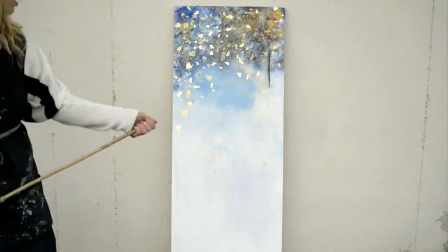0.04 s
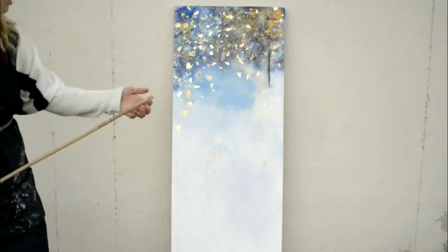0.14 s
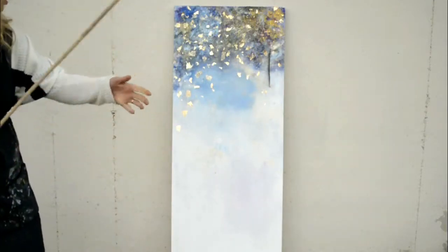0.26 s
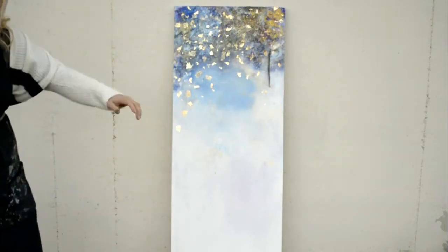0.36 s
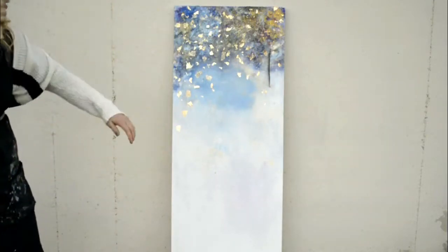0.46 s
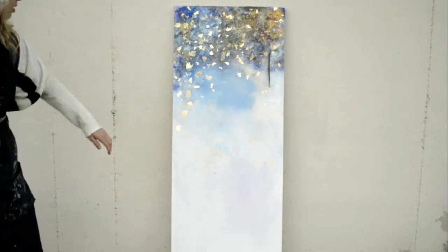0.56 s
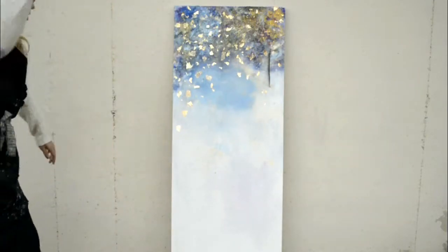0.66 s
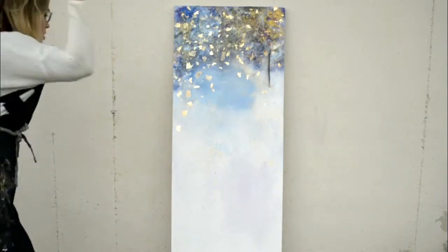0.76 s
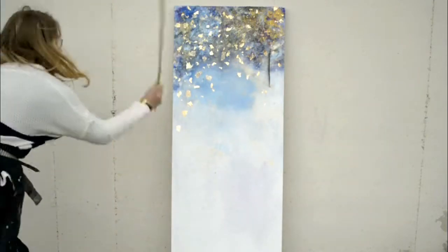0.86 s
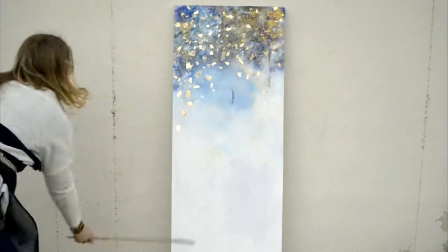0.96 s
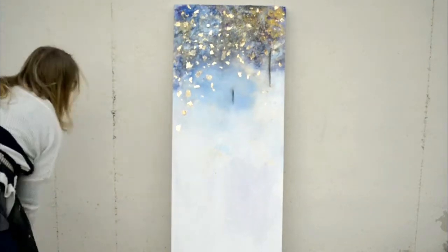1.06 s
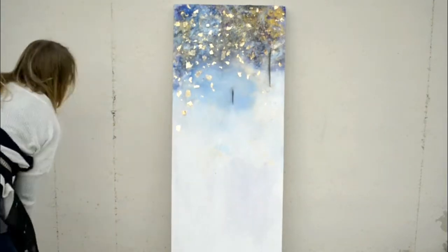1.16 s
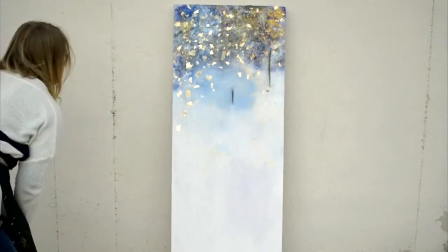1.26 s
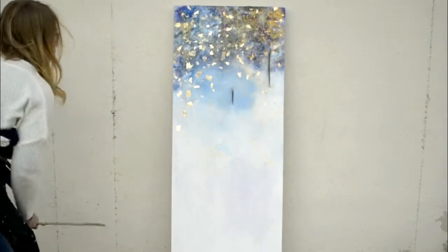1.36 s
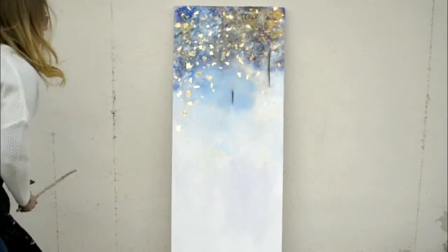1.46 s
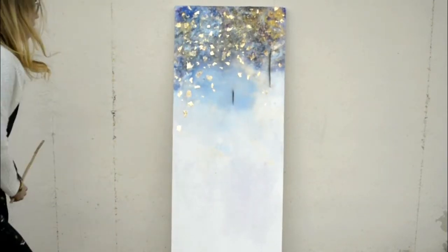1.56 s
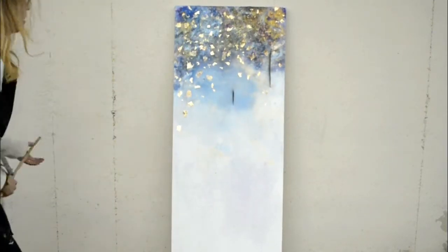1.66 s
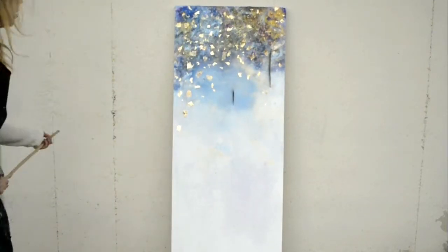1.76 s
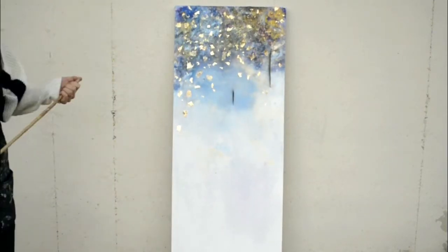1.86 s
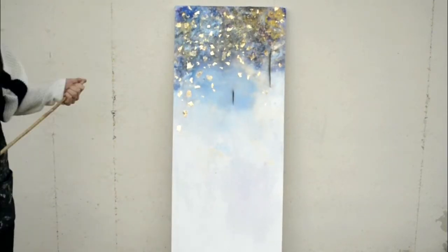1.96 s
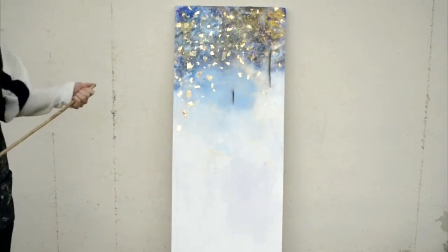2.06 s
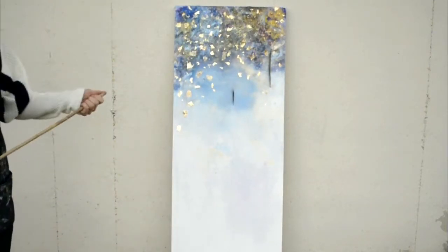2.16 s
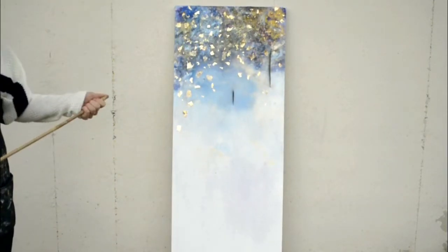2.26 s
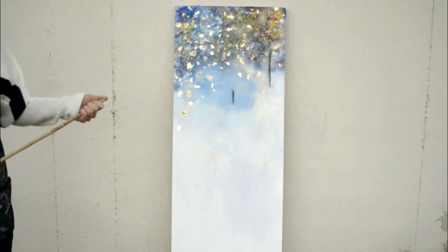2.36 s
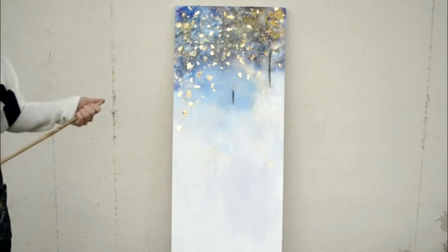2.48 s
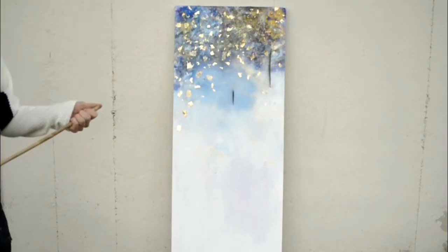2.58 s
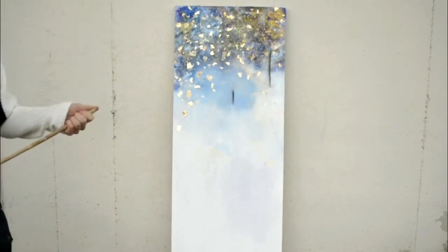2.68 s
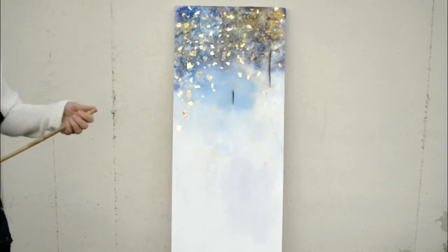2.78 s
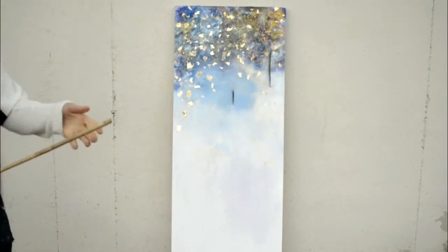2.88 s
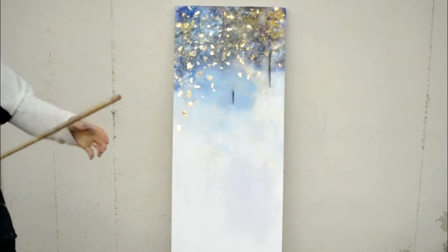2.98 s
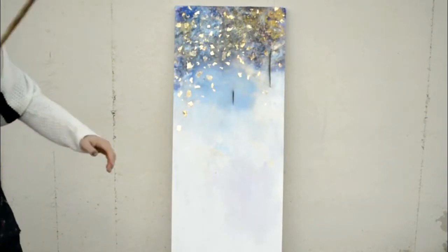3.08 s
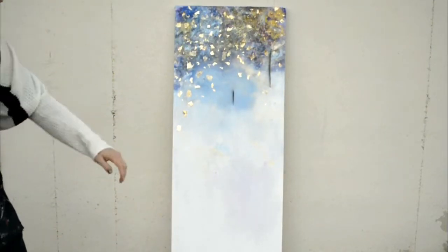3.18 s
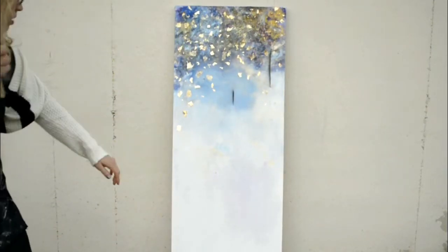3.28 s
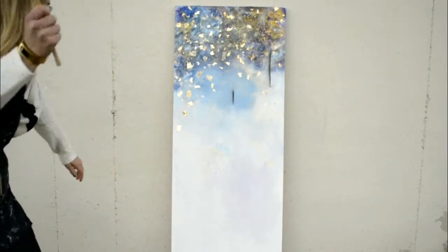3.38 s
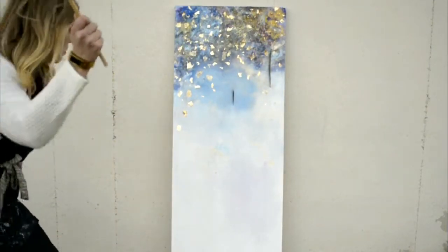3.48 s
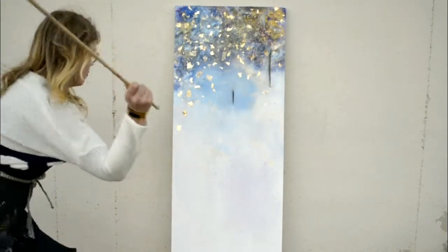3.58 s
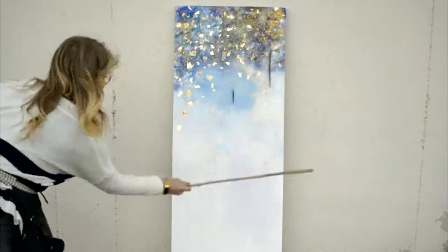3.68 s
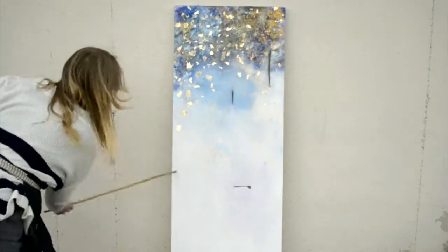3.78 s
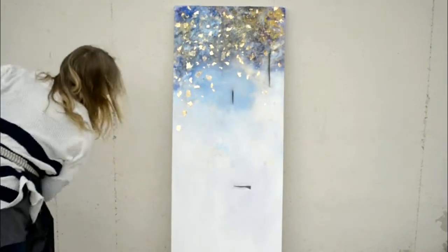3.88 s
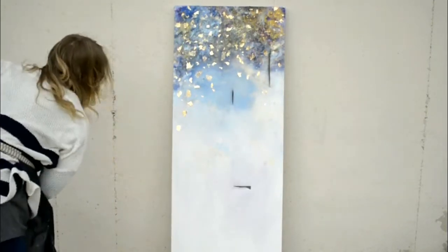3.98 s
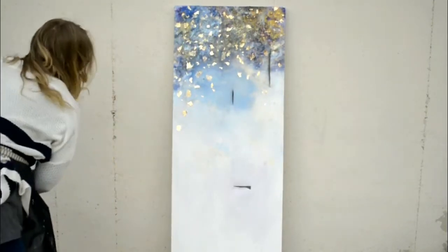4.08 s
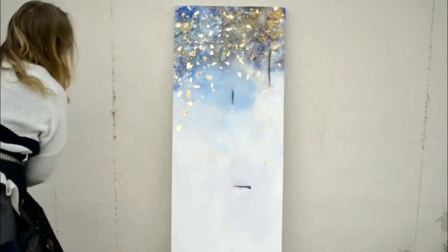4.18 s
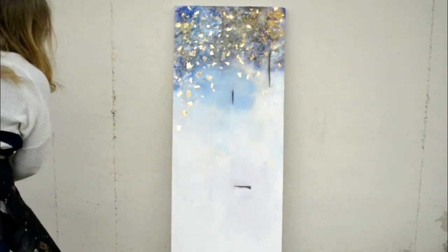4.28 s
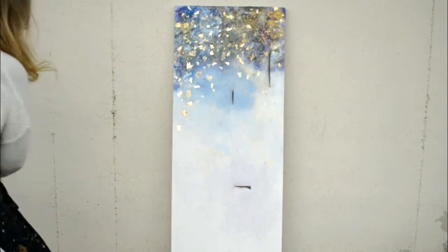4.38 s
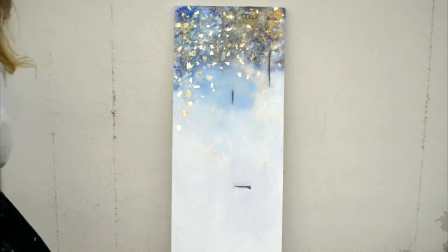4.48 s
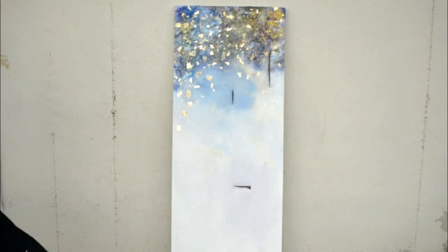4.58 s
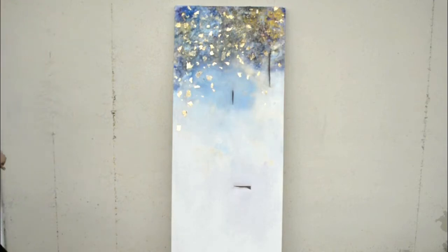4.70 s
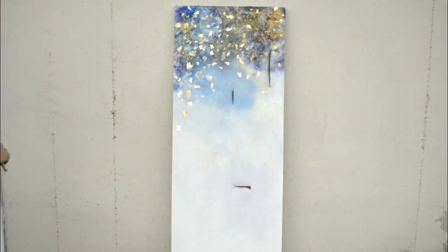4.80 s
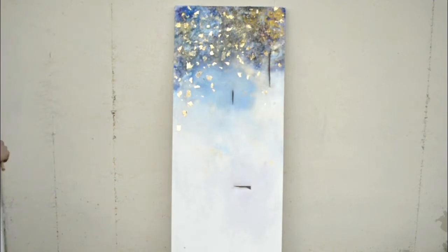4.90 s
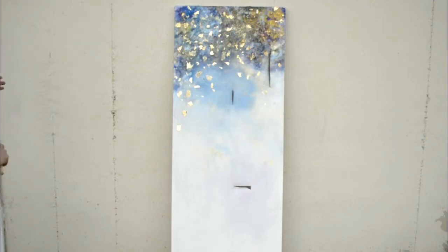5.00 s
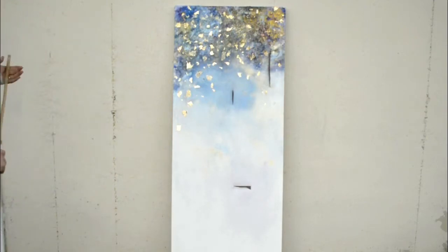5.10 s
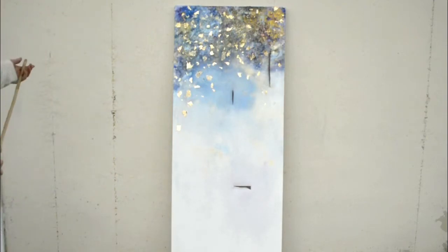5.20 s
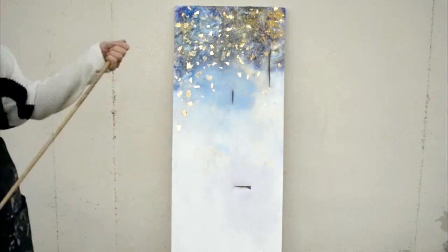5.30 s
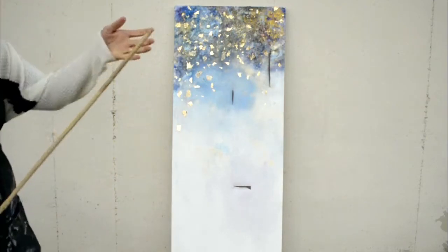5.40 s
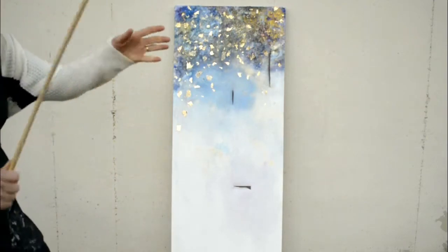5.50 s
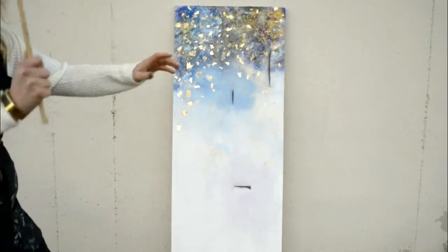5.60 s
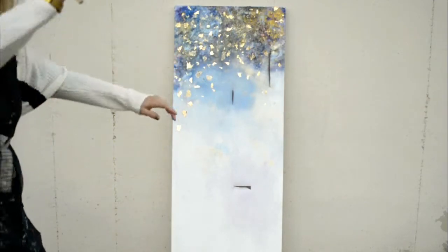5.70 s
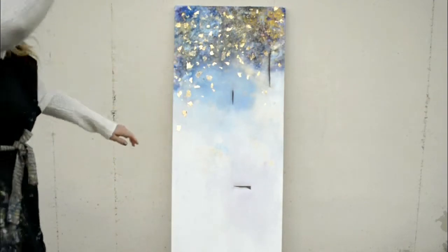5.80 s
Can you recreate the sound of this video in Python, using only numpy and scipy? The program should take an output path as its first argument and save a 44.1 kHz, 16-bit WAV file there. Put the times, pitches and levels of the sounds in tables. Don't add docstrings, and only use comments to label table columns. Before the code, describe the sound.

A long wooden stick cracks sharply against a painted panel twice in a hard-walled studio, with splinters, rustling sleeves and a faint low drone.

```python
import sys
import numpy as np
from scipy import signal
from scipy.fft import rfft, irfft, next_fast_len
from scipy.io import wavfile
from scipy.ndimage import map_coordinates

SR = 44100
rng = np.random.default_rng(int(sys.argv[2]) if len(sys.argv) > 2 else 0)


def linear_from_db(decibels):
    return 10 ** (np.asarray(decibels, float) / 20)


def store_pcm(level_fs):
    pcm = np.round(np.clip(level_fs, -1, 1) * 32767).astype(np.int16)
    wavfile.write(sys.argv[1], SR, np.atleast_2d(pcm).T)


N = 257984


def unit(x):
    return x / np.sqrt(np.mean(x ** 2) + 1e-20)


def along(points, hz):
    f, v = np.transpose(points)
    return np.interp(np.log(hz + 1), np.log(f + 1), v)


def curves(rows):
    s, *cols = np.transpose(rows)
    return [np.interp(np.arange(N) / SR, s, c) for c in cols]


def held(start, end, db, rise_db_per_s, fall_db_per_s):
    t = np.arange(N) / SR
    before, after = np.maximum(start - t, 0), np.maximum(t - end, 0)
    return linear_from_db(db - rise_db_per_s * before - fall_db_per_s * after)


def wobble(rate):
    knots = rng.standard_normal(int(N * rate / SR) + 4)
    return map_coordinates(knots, [np.arange(N) * rate / SR])


def noise(spectrum, size):
    m = next_fast_len(size + 8192)
    gain = linear_from_db(along(spectrum, np.fft.rfftfreq(m, 1 / SR)))
    return unit(irfft(rfft(rng.standard_normal(m)) * gain, m)[:size])


def tone(hz):
    return np.sqrt(2) * np.sin(2 * np.pi * (np.cumsum(hz) / SR + rng.random()))


def ring(modes, t):
    return sum(linear_from_db(db - 60 * t / t60) * np.sin(2 * np.pi * hz * t) for hz, db, t60 in modes)


def add(track, s, x):
    part = track[round(s * SR):][:len(x)]
    part += x[:len(part)]


def roomy(x, wet_db, onset=.0008):
    # f/Hz, t60/s
    decay_times = [(100, 1), (300, 0.21), (1500, 0.42), (4000, 0.33), (12000, 0.18)]
    # f/Hz, level/dB
    wall_colour = [(60, -6), (300, 0.5), (1800, -1), (5000, -4.5), (15000, -16)]
    # level/dB, t60 factor
    far_end = (-16, 2.2)
    hz, t, z = signal.stft(rng.standard_normal(SR), SR, nperseg=256)
    fall_db = -60 * t / along(decay_times, hz)[:, None]
    decay = linear_from_db(fall_db) + linear_from_db(far_end[0] + fall_db / far_end[1])
    colour = linear_from_db(along(wall_colour, hz)[:, None])
    tail = signal.istft(z * colour * decay, SR, nperseg=256)[1]
    first_wall_s = .008
    tail = np.pad(tail / np.linalg.norm(tail), (round(first_wall_s * SR), 0))
    start = x * np.exp(-np.arange(len(x)) / (onset * SR))
    level = linear_from_db(wet_db) * np.linalg.norm(x) / np.linalg.norm(start)
    wet = level * signal.fftconvolve(start, tail)
    return wet + np.pad(x, (0, len(wet) - len(x)))


def blows():
    # t/s, crack level/dB, contact/s, release f/Hz, first rebound delay/s
    hits = [
        (0.9168, -1.8, .00037, 4311, .0031),
        (3.7328, 1.83, 0.00026, 8208, .0018),
    ]
    # f/Hz, level/dB, t60/s
    high_modes = [(233, -4, 0.048), (333, -5, 0.11), (407, 0.5, 0.052), (445, -0.5, 0.1), (630, -5.5, .06),
                  (766, -5.5, .06), (1017, -2.5, 0.035), (1303, -7, .05), (1700, -1.5, 0.042),
                  (2400, -11.5, 0.048), (3260, -11.5, 0.014), (4900, -18, 0.035)]
    # f/Hz, level/dB, t60/s
    low_modes = [(173.7, -1, 0.096), (205, 2, 0.066), (423, -7.5, 0.039), (564, 0.5, 0.051),
                 (700, -4.5, 0.062), (896, -6, 0.041), (1101, -2.5, 0.043), (1160, -4.5, 0.054),
                 (1345, -8, 0.054), (1534, -5.5, 0.04), (1816, -5.5, 0.086), (2090, -7, 0.047),
                 (2501, -8.5, 0.046), (2977, -11.5, .04)]
    # f/Hz, density/dB per Hz
    paint = [(300, -120), (800, -6), (1800, 0.5), (3500, -1.5), (6000, -6), (9000, -8.5), (12000, -15.5),
             (16000, -24)]
    release_db, ring_db, rattle_db, room_db = -4, -17, -21.5, -21.5
    rebound_db, rebound_loss_db, rebound_slows, rebound_width_s = -6.5, 4.5, 1.2, .0002
    out, t = np.zeros(N), np.arange(SR // 3) / SR
    for (s, db, touch, release_hz, rebound), modes in zip(hits, (high_modes, low_modes)):
        let_go = 1 / (1 + np.exp(np.minimum((t - touch) / .000022, 50)))
        push = let_go * (1 - np.exp(-t / .00004))
        after = np.maximum(t - touch, 0)
        release = linear_from_db(release_db - 60 * after / 0.0029) * np.cos(2 * np.pi * release_hz * after)
        suction = .44 * np.exp(-after / 0.00082)
        crush = linear_from_db(-14 - 60 * t / .003) * noise(paint, len(t))
        crack = crush + push - (1 - np.exp(-after / .00004)) * (release + suction)
        for k, (late, size, soft) in enumerate(rng.standard_normal((8, 3)), 1):
            later = k ** rebound_slows
            back_db = rebound_db - rebound_loss_db * np.log2(later) + 1.1 * size
            delay, width = rebound * later * (1 + .03 * late), rebound_width_s * linear_from_db(3 * soft)
            u = (t - delay) / width
            crack = crack + linear_from_db(back_db) * (1 - 0.33 * u * u) * np.exp(-u * u / 3)
        rattle_gain = linear_from_db(rattle_db - 60 * t / 0.068) + linear_from_db(rattle_db - 16 - 60 * t / 0.16)
        rattle = rattle_gain * noise(paint, len(t))
        flutter = linear_from_db(2.6 * wobble(260)[:len(t)])
        body = linear_from_db(ring_db) * flutter * ring(modes, t) * (1 - np.exp(-t / 0.00062))
        add(out, s, roomy(linear_from_db(db) * crack + body + rattle, room_db, onset=0.00024))
    return signal.sosfilt(signal.butter(2, 90, "highpass", fs=SR, output="sos"), out)


def splinters():
    # t/s, level/dB, t60/s, knock re snap/dB,
    # room/dB
    snaps = [(0.9811, -38.5, 0.069, -8.5, -10), (1.0192, -11.5, 0.0094, -19, -12.5),
             (1.0231, -12.5, 0.0094, -28, -14.5), (1.027, -26, .09, -30, -26),
             (1.1261, -49.5, 0.042, -2, -5), (3.7965, -26, 0.023, 4, -17), (4.885, -63, 0.044, 7.5, -11),
             (4.03, -63.5, 0.042, 13, -15), (5.7, -90, 0.11, 29, -8), (5.74, -84.5, 0.099, 24, -10),
             (5.765, -85, 0.086, 27.5, -13)]
    # f/Hz, density/dB per Hz
    dry_wood = [(300, -120), (1000, -17.5), (2500, -2), (5000, -2), (8000, 0), (11000, -14), (16000, -32)]
    # f/Hz, density/dB per Hz
    landing = [(200, -120), (380, -2), (520, 3), (1100, -0.5), (1600, -6.5), (2500, -10.5), (4000, -120)]
    out, t = np.zeros(N), np.arange(SR // 8) / SR
    for s, db, t60, knock_db, wet_db in snaps:
        grain = linear_from_db(2 * wobble(900)[:len(t)])
        burst = grain * noise(dry_wood, len(t)) + linear_from_db(knock_db) * noise(landing, len(t))
        gain = linear_from_db(db - 60 * t / t60) * (1 - np.exp(-t / 0.00025))
        add(out, s, roomy(gain * burst, wet_db))
    return out


def swish():
    # start t/s, end t/s, last f/Hz, start re end/dB
    strokes = [
        (0.867, 0.918, 647.6, -36),
        (3.691, 3.732, 561, -22),
    ]
    # f/Hz, density/dB per Hz
    torn_air = [(200, -120), (400, -4), (1000, 0.5), (2500, -10), (8000, -19), (16000, -35.5)]
    # t/s, length/s, from f/Hz, to f/Hz, level/dB
    chip = (.9222, .0028, 10300, 8300, -24)
    start_hz, end_db = 357, -43.5
    out = np.zeros(N)
    for start, end, to_hz, first_db in strokes:
        u = np.linspace(0, 1, round((end - start) * SR))
        hz = start_hz + (to_hz - start_hz) * u
        sung = tone(hz * (1 + .09 * wobble(250)[:len(u)])) + linear_from_db(-6) * noise(torn_air, len(u))
        add(out, start, linear_from_db(end_db + first_db * (1 - u) ** 2) * sung)
    s, length, from_hz, to_hz, db = chip
    size = round(length * SR)
    add(out, s, linear_from_db(db) * np.hanning(size) * tone(np.linspace(from_hz, to_hz, size)))
    return out


def cloth():
    # t/s, hold/s, hiss level/dB, body re hiss/dB
    rubs = [(.001, 0.0076, -60.5, -6.5), (0.044, 0.0054, -74, -13), (.645, 0.034, -81, -6),
            (0.767, 0.11, -69, -5), (1.293, 0.038, -73, -14), (1.485, 0.027, -73, -9),
            (1.761, .1, -78, -9.5), (1.967, 0.057, -63, -6.5), (2.343, .008, -70, -5),
            (2.434, .008, -72, -15.5), (2.773, 0.017, -66, -12), (3.519, 0.1, -68.5, -11.5),
            (4.021, 0.076, -71.5, 3), (4.238, 0.063, -69.5, -5), (4.378, .012, -72.5, -14),
            (4.388, 0.13, -78, -2), (4.579, 0.084, -70, -5), (4.6, 0.058, -69, -8.5),
            (4.829, 0.019, -71.5, -13), (4.89, 0.017, -49, -0.5), (4.92, 0.017, -55.5, -2),
            (4.95, 0.053, -76.5, 2.5), (5.281, 0.011, -76, 6), (5.63, .04, -80, 6)]
    # t/s, half width/s, hiss level/dB, body re hiss/dB
    sways = [(.344, 0.085, -81, -7), (.66, 0.098, -80, 0), (1.151, .04, -69, 3.5), (4.33, 0.042, -80, 6),
             (1.37, 0.077, -78.5, 2.5), (1.7, .12, -79.5, -7), (1.995, 0.012, -53, -12),
             (3.25, 0.36, -79.5, -3.5), (3.67, 0.063, -71.5, -8), (3.78, .05, -58, -12),
             (3.901, .07, -67, -12), (4.16, 0.085, -80, 2), (4.74, .08, -89.5, 11), (5.2, 0.093, -83, 9.5),
             (5.45, .1, -72.5, 1.5), (5.8, .1, -80, 2.5)]
    # t/s, peak level/dB, body re peak/dB
    creases = [(0.777, -62, -15), (0.798, -49, -22), (1.403, -60.5, 10), (1.4894, -53, -14),
               (1.764, -49, -4), (1.9655, -46.5, -13), (1.9913, -36, -23), (2.0305, -48.5, -26),
               (2.2264, -58.5, -2), (2.4357, -51, -17.5), (2.4578, -55, -14.5), (2.7684, -59.5, -11.5),
               (3.4157, -57, -5), (4.0302, -60, -2), (4.0894, -52, -6), (4.2394, -46, -20.5),
               (4.496, -54.5, -15), (4.2899, -47.5, 1), (4.2964, -51, -7), (4.378, -55.5, -16),
               (4.4371, -52.5, -3), (1.527, -56.5, -12), (4.889, -40.5, -3), (4.911, -35, -4),
               (4.9276, -37, -2), (4.9366, -39, -5), (5.2847, -61, -6), (5.6145, -54.5, -6),
               (5.6354, -59, -9), (5.6599, -52, -12)]
    # f/Hz, density/dB per Hz
    weave = [(1470, -34), (2500, -6.5), (3410, -3.5), (4170, -8), (4910, -7), (8020, -1), (12000, -12),
             (16000, -25)]
    # f/Hz, density/dB per Hz
    fold = [(300, -120), (450, -6.5), (700, 0), (1500, -1.5), (3200, -5), (4500, -12.5), (6000, -120)]
    hiss, body = np.zeros(N), np.zeros(N)
    for s, hold, db, low_db in rubs:
        gain = held(s, s + hold, db, rise_db_per_s=2500, fall_db_per_s=899.5)
        hiss += gain
        body += gain * linear_from_db(low_db)
    for s, width, db, low_db in sways:
        gain = linear_from_db(db) * np.exp(-((np.arange(N) / SR - s) / width) ** 2)
        hiss += gain
        body += gain * linear_from_db(low_db)
    grain = unit(linear_from_db(2.5 * wobble(400) + 1.3 * wobble(90)))
    rustle = grain * (hiss * noise(weave, N) + body * noise(fold, N))
    t = np.arange(SR // 20) / SR
    decay = linear_from_db(-60 * t / .009) + linear_from_db(-22 - 60 * t / .05)
    for s, db, low_db in creases:
        snap = noise(weave, len(t)) + linear_from_db(low_db + 3.0) * noise(fold, len(t))
        add(rustle, s, linear_from_db(db - 6.5) * decay * snap)
    return rustle


def shoe():
    # t/s, level/dB, room/dB
    steps = [
        (1.4134, -41.5, -16),
        (1.876, -64.5, -8),
        (3.828, -47, -15),
        (5.33, -68, -12),
    ]
    # f/Hz, level/dB, t60/s
    board = [(190, -5, 0.14), (306, -3, 0.077), (380, 9, 0.047), (541, -6.5, 0.094), (805, 2, 0.025)]
    out, t = np.zeros(N), np.arange(SR // 5) / SR
    for s, db, wet_db in steps:
        knock = linear_from_db(db) * ring(board, t) * (1 - np.exp(-t / 0.00087))
        add(out, s, roomy(knock, wet_db, onset=0.011))
    return out


def drone():
    # t/s, f/Hz, level/dB
    engine = [(0, 95.3, -59), (.85, 94.7, -63.5), (1.36, 94.9, -63.5), (1.5, 93.4, -63.5),
              (1.9, 93.67, -61), (2.46, 92.5, -57.5), (3.6, 93.2, -57.5), (4.9, 93.26, -57.5),
              (5.85, 93.3, -58.5)]
    # multiple of the pitch, level/dB
    steady_orders = [(2, -81), (3, -86), (4, -82), (5, -85.5), (6, -88), (1.5, -79)]
    # multiple of the pitch, from t/s, to t/s, level/dB
    swells = [(2, -1.4, -0.16, -59.5), (2, 1.52, 3.5, -65), (2, 3, 5.9, -63.5), (3, 0.32, .7, -68),
              (3, 4, 2.3, -75), (3, 3, 3.3, -70), (3, 3.5, 5.0, -67.5), (3, 5, 5.6, -70.5),
              (4, 1.4, 1.74, -74.5), (4, 2.5, 3, -72), (4, 3.5, 4, -76), (1.5, 1.1, 1.5, -70),
              (6, 1.65, 2.5, -78.5), (6, 6, 6.5, -82)]
    hz, db = curves(engine)
    hz = hz + 0.64 * wobble(5.5)
    low = linear_from_db(db + 0.96 * wobble(7.4)) * tone(hz)
    for k in {round(2 * row[0]) / 2 for row in swells}:
        power = np.zeros(N)
        for order, start, end, level in swells:
            if round(2 * order) / 2 == k:
                power += held(start, end, level, rise_db_per_s=70, fall_db_per_s=70) ** 2
        low = low + np.sqrt(power) * linear_from_db(0.73 * wobble(4.4)) * tone(k * hz)
    high = sum(linear_from_db(level + 6.2 * wobble(1.5)) * tone(k * hz) for k, level in steady_orders)
    squeal_s, squeal_hz, squeal_db = 1.73, 1266, -67
    start, end = squeal_s - .54, squeal_s + .5
    fade_db, = curves([(start - .05, -45), (start, -4.5), (squeal_s, 0), (end, -16.5), (end + .05, -45)])
    squeal = linear_from_db(squeal_db + fade_db + 1.1 * wobble(9)) * tone(squeal_hz + 1.3 * wobble(24))
    return low + high + squeal


def bird():
    start, rise, drop, rest = 5.215, .036, .016, .03
    low_hz, top_hz, end_hz = 3300, 4100, 3150
    top, low = start + rise, start + rise + drop
    linger = top - .012
    hz, = curves([(start, low_hz), (linger, .97 * top_hz), (top, top_hz),
                  (low, 1.03 * end_hz), (low + rest, end_hz)])
    hz = hz * (1 + .03 * wobble(500))
    gain = held(top - .02, low + .012, -70, rise_db_per_s=900, fall_db_per_s=900)
    voice = tone(hz) + linear_from_db(-11) * tone(2 * hz)
    return roomy(gain * linear_from_db(3 * wobble(120)) * voice, wet_db=-5, onset=100)[:N]


def air():
    # f/Hz, density/dB per Hz
    air_colour = [(20, -22), (40, -8.5), (65, 2.5), (110, 3.5), (160, -1.5), (250, -4), (500, -6),
                  (1000, -7.5), (2000, -14), (3200, -23), (8000, -27.5), (13000, -35), (16000, -39.5)]
    level_db = -66
    return linear_from_db(level_db + 0.2 * wobble(1.9) + 0.82 * wobble(32)) * noise(air_colour, N)


def scene():
    return (blows() + splinters() + swish() + cloth() + shoe() + drone() + bird() + air())[None]


def top_cut(x):
    return signal.sosfilt(signal.butter(12, 16580, fs=SR, output="sos"), x)


def record(dry):
    heard = signal.sosfilt(signal.butter(1, 40, "highpass", fs=SR, output="sos"), dry)
    heard = signal.sosfilt(signal.butter(2, 15000, "lowpass", fs=SR, output="sos"), heard)
    mix = heard / (1 + np.abs(heard / .98) ** 8) ** (1 / 8)
    return top_cut(mix)


dry = scene()
out = record(dry)
store_pcm(out)
```